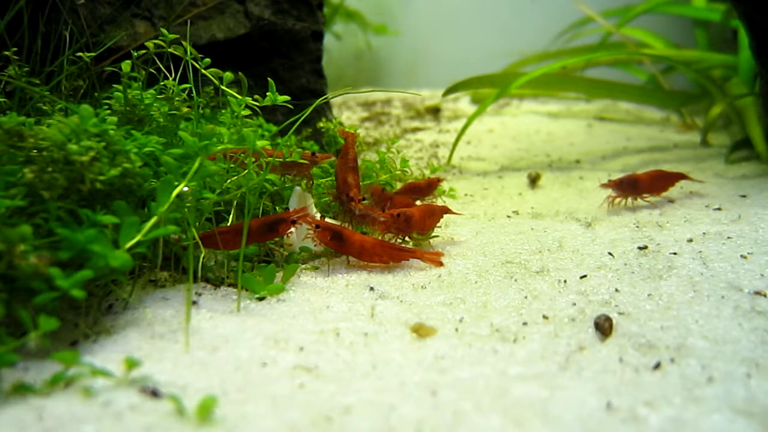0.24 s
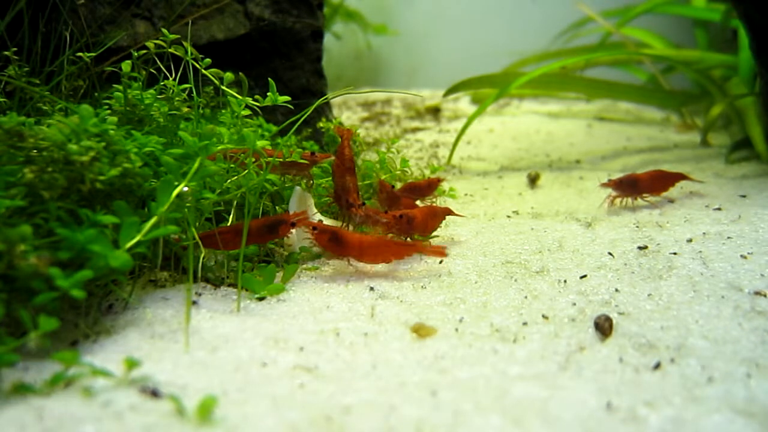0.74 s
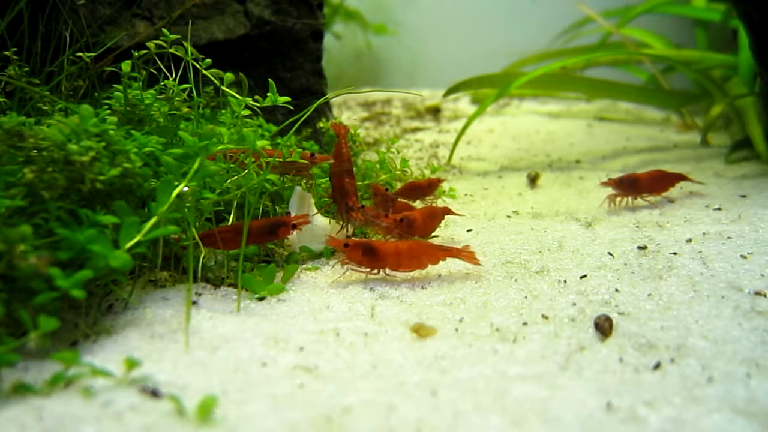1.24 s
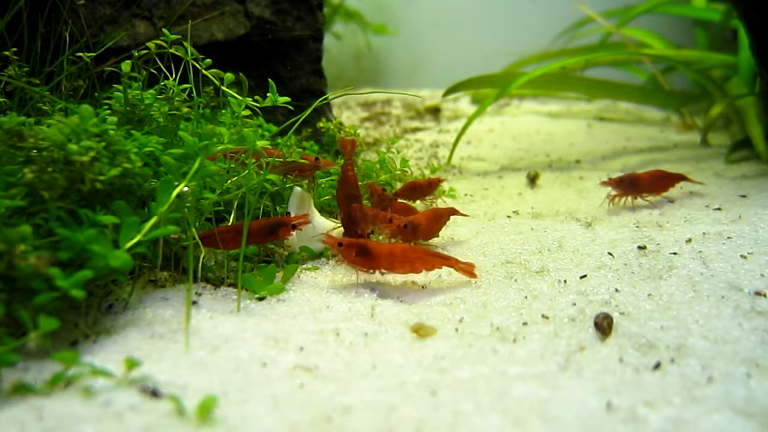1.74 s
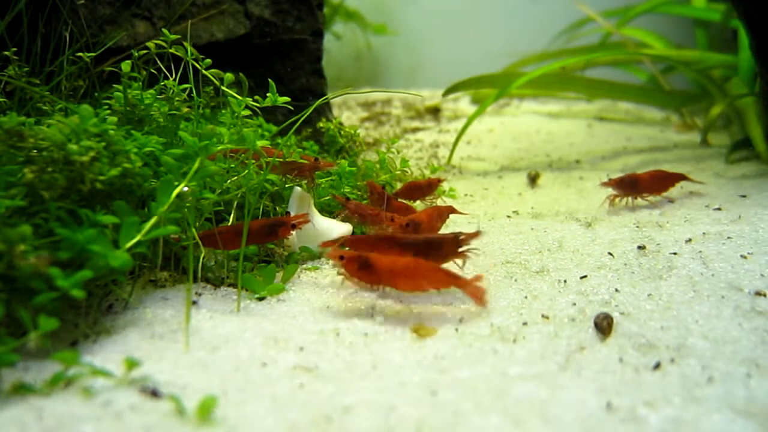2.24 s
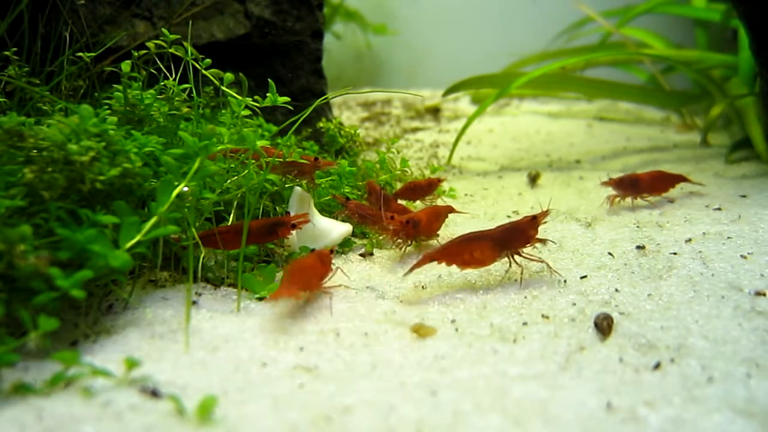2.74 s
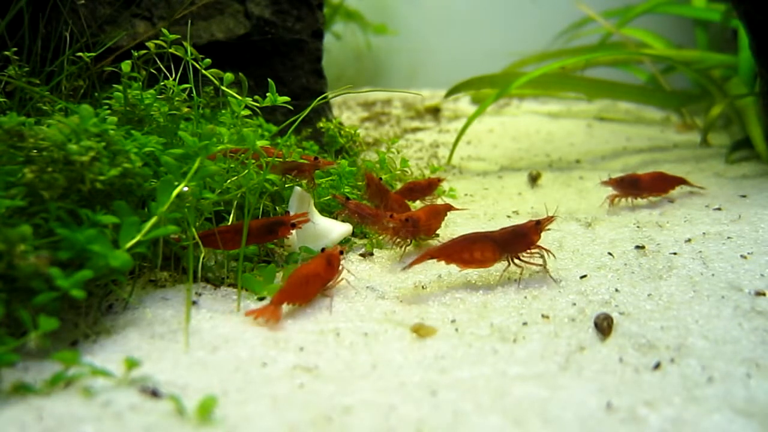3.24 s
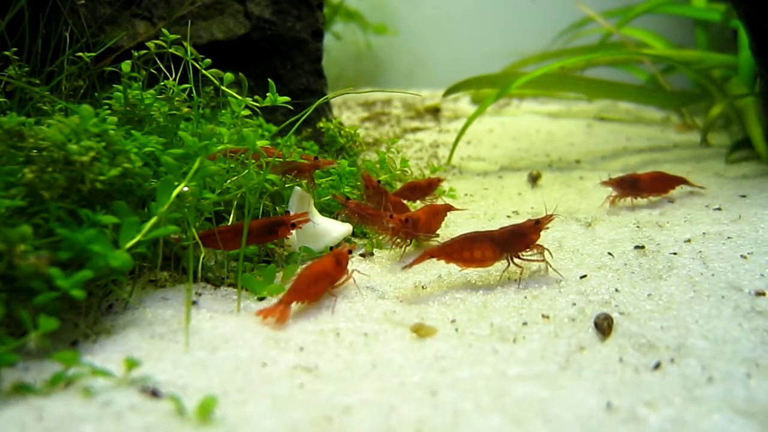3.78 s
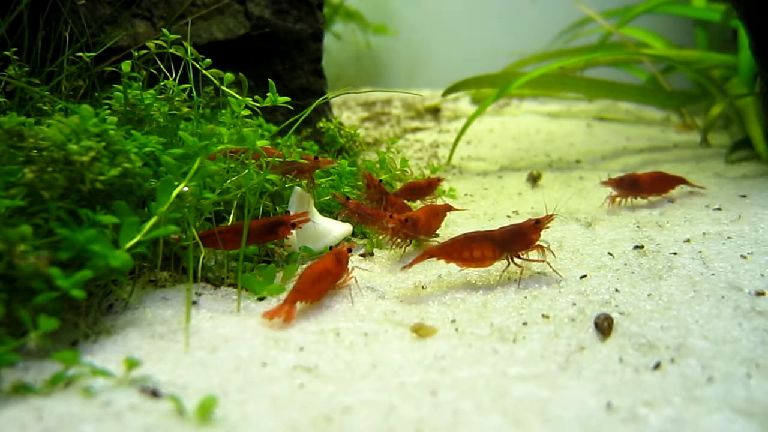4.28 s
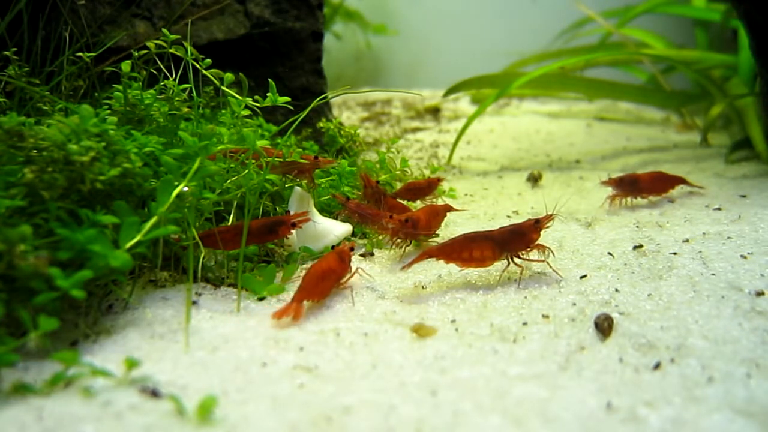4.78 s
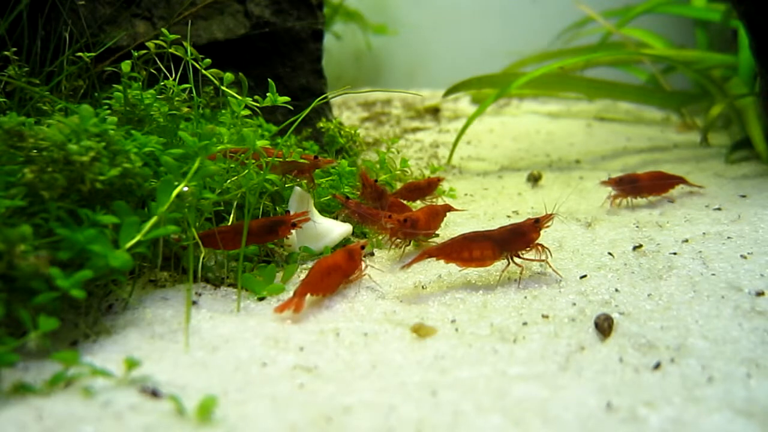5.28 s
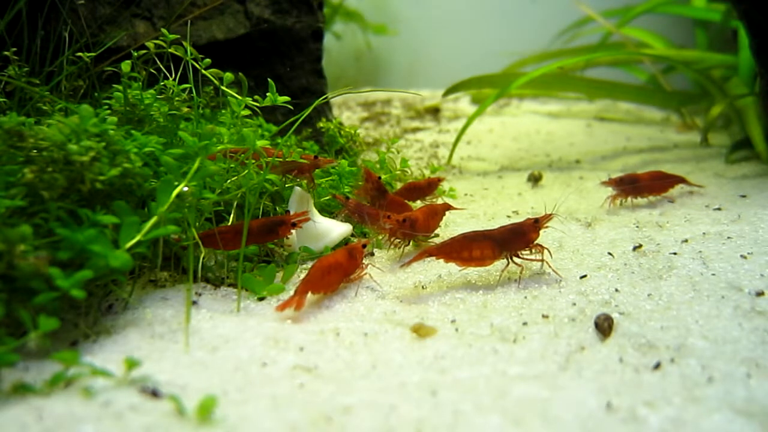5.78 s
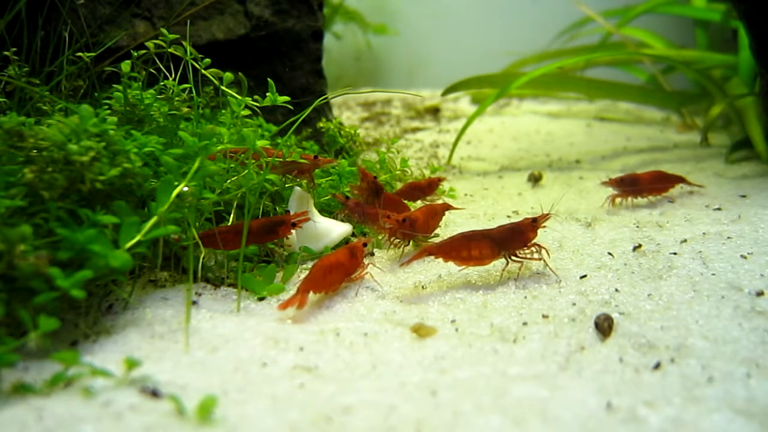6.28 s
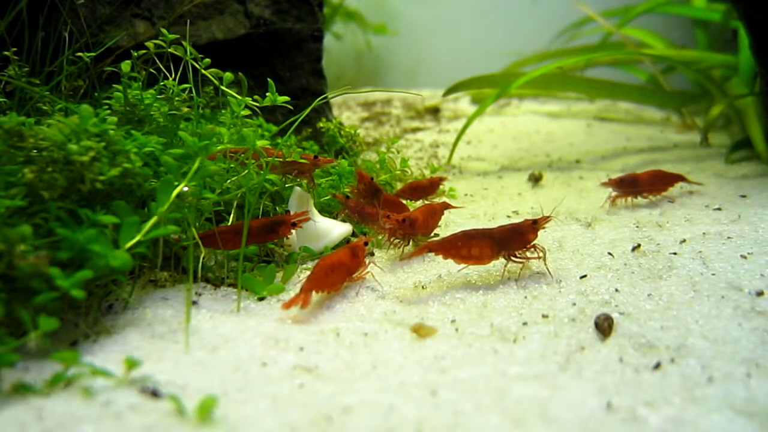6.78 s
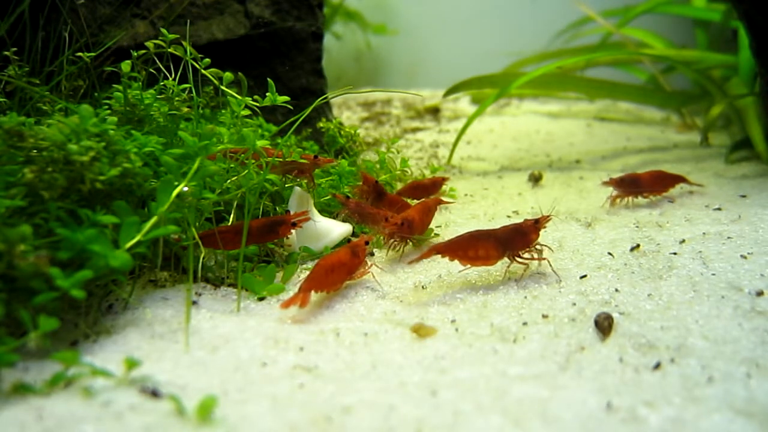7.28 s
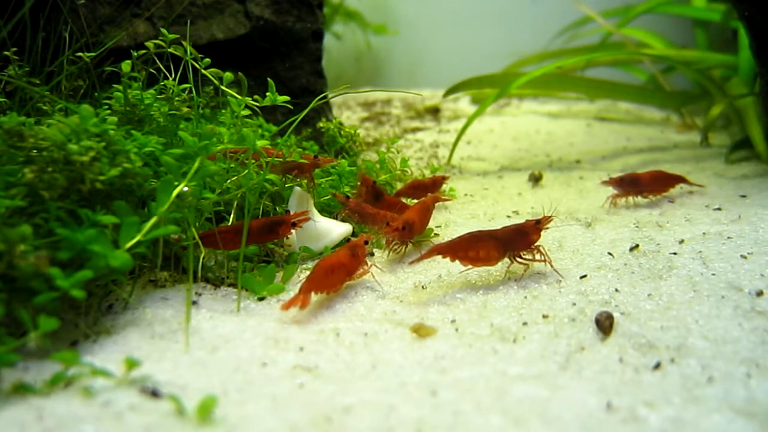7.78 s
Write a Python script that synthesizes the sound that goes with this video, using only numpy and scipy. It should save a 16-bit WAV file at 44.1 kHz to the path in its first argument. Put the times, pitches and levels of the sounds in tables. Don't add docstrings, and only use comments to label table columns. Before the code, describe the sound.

Close, constant mains buzz of a fish tank pump, slightly fluttering, over faint airy hiss, with a few barely audible ticks and a rustle.

```python
import sys
import numpy as np
from scipy import signal
from scipy.fft import rfft, irfft, next_fast_len
from scipy.io import wavfile
from scipy.ndimage import uniform_filter1d

SR = 44100
rng = np.random.default_rng(int(sys.argv[2]) if len(sys.argv) > 2 else 0)


def bounce(signal):
    frames = np.transpose(np.atleast_2d(signal))
    limited = np.clip(frames, -1, 1)
    pcm = np.round(limited * 32767).astype(np.int16)
    wavfile.write(sys.argv[1], SR, pcm)


def field_ratio(decibels):
    return 10 ** (np.asarray(decibels, dtype=float) / 20)


N = 353682


def evened(x):
    return x / np.sqrt(np.mean(x ** 2) + 1e-20)


def read_curve(points, hz):
    point_hz, value = np.transpose(points)
    return np.interp(np.log(hz + 1), np.log(point_hz + 1), value)


def slow_drift(hz, count):
    size = next_fast_len(N)
    f = np.fft.rfftfreq(size, 1 / SR)[:size // 8]
    real, imag = rng.standard_normal((2, count, len(f)))
    drift = irfft((real + 1j * imag) / (1 + (f / hz) ** 2), size)[:, :N]
    return drift / drift.std(1, keepdims=True)


def placed(wave, lean_db, lead_rad):
    left = wave * field_ratio(lean_db / 2) * np.exp(.5j * lead_rad)
    right = wave * field_ratio(-lean_db / 2) * np.exp(-.5j * lead_rad)
    return np.real([left, right])


# pitch_hz, level_db (per Hz)
ROOM_AIR = [(12, -100), (35, -79), (160, -74.5), (400, -77.5), (1200, -84.5), (2100, -91), (3800, -105.5),
            (8000, -117)]
# pitch_hz, level_db (per Hz)
CAPSULE_NOISE = [(1000, -108.5), (7000, -106.5), (9500, -111.5), (15000, -117.6)]


def noise_colour(hz, air_db=0, capsule_db=0):
    port_hz, port_width_hz, port_db = 11970, 3100, -19
    air = field_ratio(read_curve(ROOM_AIR, hz) + air_db)
    capsule = field_ratio(read_curve(CAPSULE_NOISE, hz) + capsule_db)
    off = ((hz - port_hz) / port_width_hz) ** 2
    return np.hypot(air, capsule) * np.sqrt((off + field_ratio(2 * port_db)) / (off + 1))


# pitch_hz, level_db
AIR_IN_SUM = [(25, -3.5), (42, 0), (58, -0.5), (70, -6), (130, -3), (190, -5.5), (700, -4), (1700, -5)]
# pitch_hz, level_db
WIDENING = [(4000, 3), (8000, 0.7), (14000, -5)]


def hiss(patchy_db=-0.1, swell_db=0.44):
    frames, hz = N // 1024 + 6, np.fft.rfftfreq(4096, 1 / SR)
    a, b, c, d, patches = rng.standard_normal((frames, 2049, 5)).T
    patches = uniform_filter1d(patches, size=40, axis=0)
    patches = evened(uniform_filter1d(patches, size=5, axis=1))
    swell = evened(uniform_filter1d(rng.standard_normal(frames), size=8))

    mid_colour = noise_colour(hz, air_db=read_curve(AIR_IN_SUM, hz))
    side_colour = noise_colour(hz, capsule_db=read_curve(WIDENING, hz))
    spectra = np.array([(a + 1j * b) * mid_colour[:, None], (c + 1j * d) * side_colour[:, None]])
    spectra *= field_ratio(patchy_db * patches + swell_db * swell)
    unit = np.sqrt(SR / 4096 * 3)
    mid, side = unit * signal.istft(spectra, nperseg=4096, noverlap=3072)[1][:, :N] / 2
    return np.array([mid + side, mid - side])


# start_s, length_s, centre_hz, width_hz, level_db
RUSTLE_EVENTS = [
    (4.535, .014, 10000, 11000, -70.5),
    (7.815, .035, 6200, 1800, -71),
    (6.36, .24, 650, 700, -60),
]


def rustles():
    size = 8192
    f, t = np.fft.rfftfreq(size, 1 / SR), np.arange(size) / SR
    out = np.zeros((2, N))
    noises = rng.standard_normal((len(RUSTLE_EVENTS), 2, size))
    for (start_s, length_s, centre_hz, width_hz, level_db), noise in zip(RUSTLE_EVENTS, noises):
        band = noise_colour(f) / (1 + (2 * (f - centre_hz) / width_hz) ** 8)
        burst = evened(irfft(rfft(noise + noise[0]) * band))
        swell = np.sin(np.pi * np.clip(t / length_s, 0, 1))
        part = out[:, round(start_s * SR):][:, :size]
        part += (field_ratio(level_db) * burst * swell)[:, :part.shape[1]]
    return out


def ringing(resonances):
    t = np.arange(N) / SR
    out = np.zeros((2, N))
    for pitch_hz, width_hz, level_db, lean_db, lead_rad in resonances:
        a, b = slow_drift(width_hz / 1.46, count=2)
        out += placed(field_ratio(level_db) * (a + 1j * b) * np.exp(2j * np.pi * pitch_hz * t), lean_db, lead_rad)
    return out


# pitch_hz, width_hz, level_db, lean_db (left-right), lead_rad (left)
TANK_RINGS = [(263.8, 29, -67, 3, 0), (425.2, 12, -71.5, 1, 0.011), (666, 24, -71.5, 1, 0),
              (855, 45, -79, 2, 0.0025), (1073, 60, -76.5, 0, 0)]


def tank():
    return ringing(TANK_RINGS)


# pitch_hz, width_hz, level_db, lean_db (left-right), lead_rad (left)
HOUSING_RINGS = [(1406, 128, -64, 3, -1.48), (1327, 50, -79, 1, 0), (1722, 100, -70.5, 1, -3.5),
                 (1820, 79, -89, 5.5, -4.5), (2254, 320, -72.5, 9.5, -2.5), (2600, 200, -79, 2, -1),
                 (3053, 340, -77, 0, -2)]


def housing():
    return ringing(HOUSING_RINGS)


# pitch_hz, level_db, lean_db (left-right), lead_rad (left)
WHINE_TONES = [(1393.8, -68.6, 4.9, -1.7), (1823.2, -85.2, 5.7, -2.7), (2285.7, -88.2, 11.8, -2.6),
               (2397.2, -85.9, 1.2, -0.5), (3289.2, -88.1, -6.7, 1.6), (4738.7, -96.4, 5.9, 0.9),
               (6634.2, -97.3, -4.2, 1.1), (7867.1, -106.5, 12.8, -1.6), (15734.3, -113.2, 10.3, -1.4),
               (15747.3, -118.8, 10.5, 1.3)]


def whines():
    t = np.arange(N) / SR
    out = np.zeros((2, N))
    starts = rng.random(len(WHINE_TONES))
    for (pitch_hz, level_db, lean_db, lead_rad), start in zip(WHINE_TONES, starts):
        tone = np.sqrt(2) * field_ratio(level_db) * np.exp(2j * np.pi * (pitch_hz * t + start))
        out += placed(tone, lean_db, lead_rad)
    return out


# order (multiple of mains), level_db, lean_db (left-right)
PUMP_ORDERS = [(2, -44.9, -0.4), (3, -45.9, -0.6), (4, -78.0, -2.4), (5, -49.9, -0.1), (6, -60.4, -0.8),
               (7, -66.5, 0.4), (8, -68.2, 2.1), (9, -70.2, -4.8), (11, -72.5, -0.9), (13, -68.3, -2.3),
               (15, -77.2, -0.5), (16, -78.4, -1.6), (19, -80.1, -3.6), (24, -78.8, -0.9)]
TURNED_ORDERS = (6, 9, 11, 13)


def pump(flutter=0.052, flutter_hz=9):
    mains_hz, panel_hz = 50.0153, 325
    start_rad, travel_rad, bending_rad = 4.33, .87, 10.8
    cycle = 2 * np.pi * mains_hz * np.arange(N) / SR
    load = slow_drift(flutter_hz, count=2)
    out = np.zeros((2, N))
    for order, level_db, lean_db in PUMP_ORDERS:
        phase = start_rad + travel_rad * order - bending_rad * np.sqrt(order)
        if order in TURNED_ORDERS:
            phase += np.pi
        if order * mains_hz > panel_hz:
            phase -= np.pi / 2
        wobble = 1 + flutter * np.sqrt(min(order, 5)) * (load[0] + 1j * load[1]) / 2
        tone = np.sqrt(2) * field_ratio(level_db) * wobble * np.exp(1j * (order * cycle + phase))
        out += placed(tone, lean_db, 0)
    return out


def scene():
    return hiss() + rustles() + tank() + housing() + whines() + pump()


def top_cut(x):
    return signal.sosfilt(signal.butter(12, 16580, fs=SR, output="sos"), x)


def record(dry):
    edge = signal.firwin(1023, 15740, window=("kaiser", 9), fs=SR)
    mix = signal.oaconvolve(dry, edge[None], "same")
    return top_cut(mix)


dry = scene()
out = record(dry)
bounce(out)
```